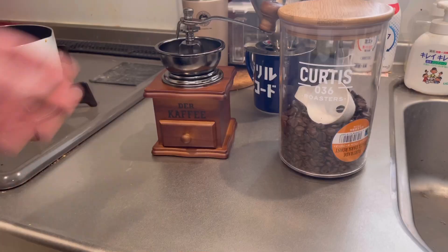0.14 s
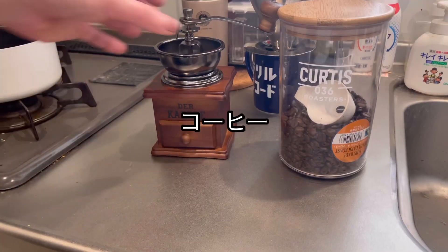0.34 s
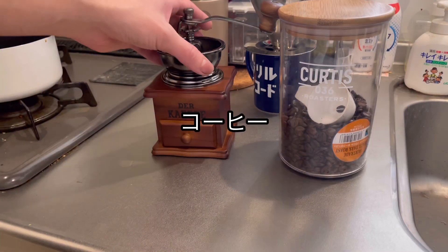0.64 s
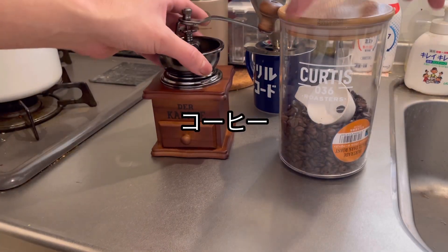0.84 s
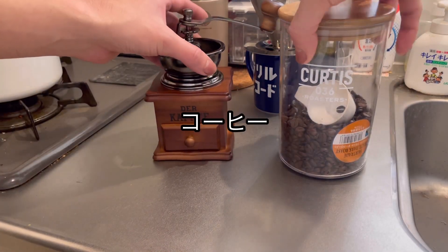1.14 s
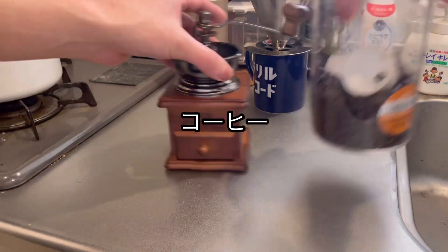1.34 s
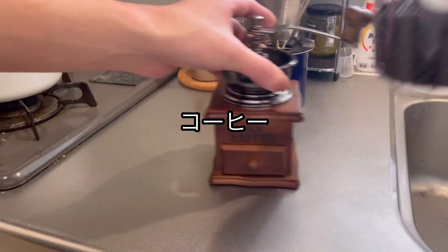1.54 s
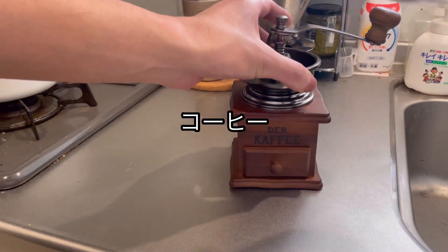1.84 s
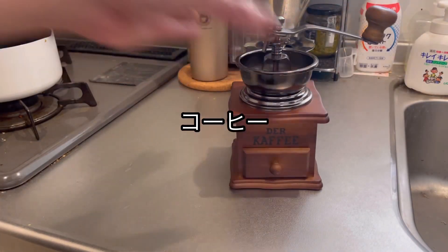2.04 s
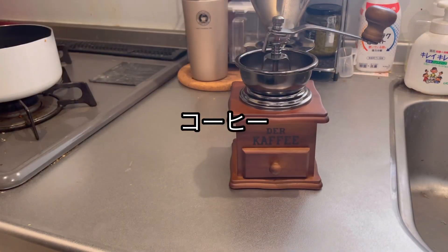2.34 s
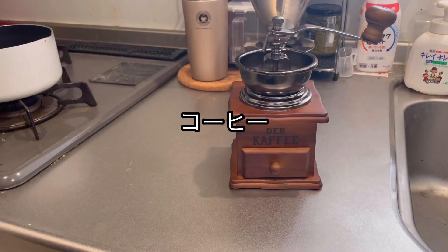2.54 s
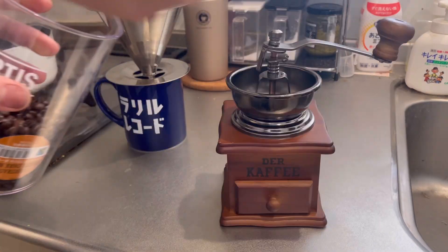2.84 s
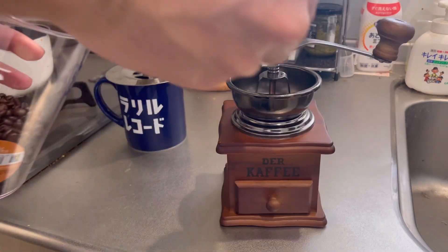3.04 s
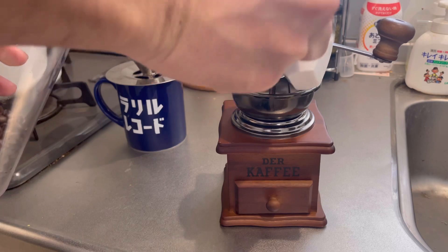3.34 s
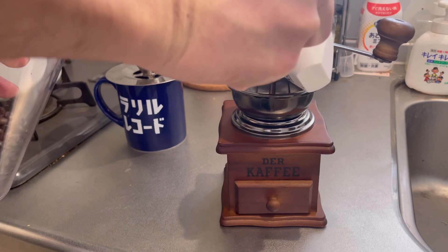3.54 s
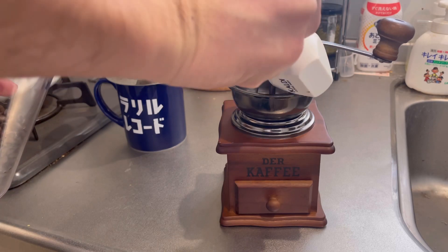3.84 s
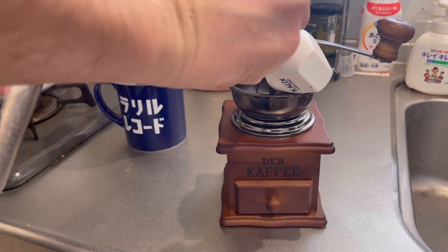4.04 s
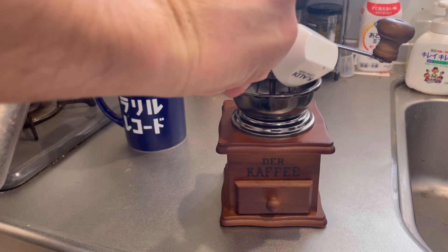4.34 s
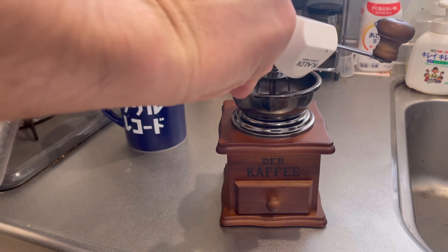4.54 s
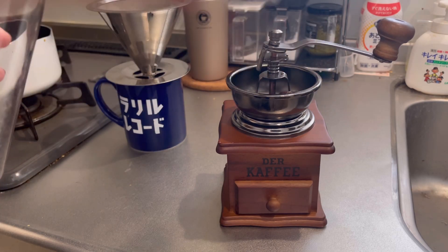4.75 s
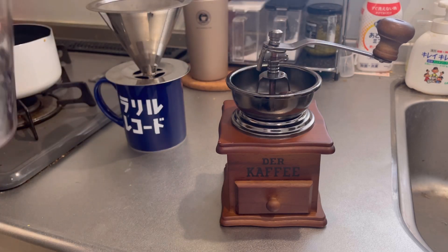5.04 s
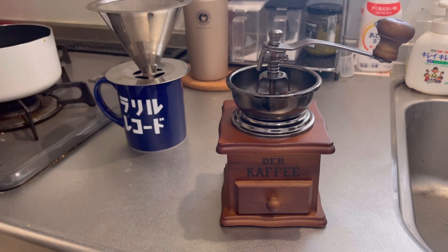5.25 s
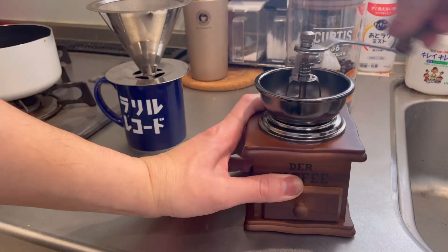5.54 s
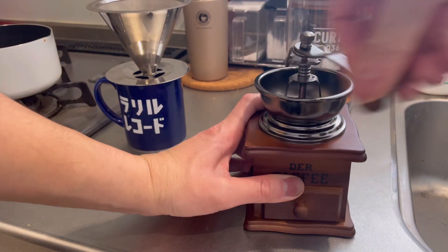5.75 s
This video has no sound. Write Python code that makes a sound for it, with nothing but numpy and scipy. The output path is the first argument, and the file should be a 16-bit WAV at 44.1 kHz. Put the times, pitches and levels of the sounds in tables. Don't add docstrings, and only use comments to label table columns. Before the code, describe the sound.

Soft rustles and counter thuds, a scoop's clink and brief shower of coffee beans in metal, then a sharp clack and harsh crackling grinding.

```python
import sys
import numpy as np
from scipy import signal
from scipy.fft import rfft, irfft, next_fast_len
from scipy.io import wavfile
from scipy.ndimage import uniform_filter1d

SR = 44100
rng = np.random.default_rng(int(sys.argv[2]) if len(sys.argv) > 2 else 0)


def boost_factor(decibels):
    exponent = np.asarray(decibels, float) / 20
    return 10 ** exponent


def inscribe(sig):
    pcm = np.round(np.clip(np.atleast_2d(sig).T, -1, 1) * 32767)
    wavfile.write(sys.argv[1], SR, pcm.astype(np.int16))


N = 259749
T = np.arange(N) / SR


def evened(x):
    return x / np.sqrt(np.mean(x ** 2) + 1e-20)


def drift(samples):
    return evened(uniform_filter1d(uniform_filter1d(rng.standard_normal(N), samples), samples))


def read(points, hz):
    f, value = np.transpose(points)
    return np.interp(np.log(hz + 1), np.log(f + 1), value)


def curves(rows, fade=.01):
    s, *columns = np.transpose(rows)
    gate = np.clip(np.minimum(T - s[0], s[-1] + .01 - T) / fade, 0, 1)
    return gate, *(np.interp(T, s, c) for c in columns)


def colour(x, points):
    gain = np.log(boost_factor(read(points, abs(np.fft.fftfreq(2048, 1 / SR)))))
    taps = np.fft.ifft(np.exp(gain - 1j * signal.hilbert(gain).imag)).real[:1024]
    return signal.oaconvolve(x, taps / np.linalg.norm(taps))[:len(x)]


def resonate(x, hz, width):
    turn = np.exp(2j * np.pi * np.cumsum(hz * np.ones(len(x))) / SR)
    r = np.exp(-np.pi * width / SR)
    return 2 * (turn * signal.lfilter([1 - r], [1, -r], x / turn)).real


def ring(x, hz, t60):
    r = 10 ** (-3 / (t60 * SR))
    w = 2 * np.pi * hz / SR
    return signal.lfilter([0, np.sin(w)], [1, -2 * r * np.cos(w), r * r], x)


def modes(x, table, sign=1):
    return sum(boost_factor(db) * sign ** k * ring(x, hz, t60) for k, (hz, db, t60) in enumerate(table))


def tap(x, hz, t60):
    contact_s = 0.0036
    return ring(ring(x, hz, t60), hz, contact_s) * 2 * (1 - 10 ** (-3 / (contact_s * SR)))


def clicks(times, db):
    x = np.zeros(N)
    np.add.at(x, np.round(np.multiply(times, SR)).astype(int), boost_factor(db))
    return x


def shower(per_s, spread_db):
    size = boost_factor(spread_db * np.minimum(rng.exponential(1, N), 4)) * rng.choice([-1, 1], N)
    return evened(size * (rng.random(N) < per_s / SR))


def splinter(x, t60):
    r = 10 ** (-3 / (t60 * SR))
    return signal.lfilter([1], [1, -r], abs(x)) * rng.standard_normal(N)


def bursts(rows, rise=0.0024):
    out, t, hz = np.zeros(N), np.arange(8192) / SR, np.fft.rfftfreq(8192, 1 / SR)
    for s, db, centre_hz, octaves, t60 in rows:
        band = np.exp(-.5 * (np.log2((hz + 1) / centre_hz) / octaves) ** 2)
        shape = boost_factor(db - 8.5 - 60 * t / t60) * np.minimum(t / rise, 1)
        burst = irfft(rfft(rng.standard_normal(8192)) * band) * shape
        burst *= np.linalg.norm(shape) / np.linalg.norm(burst)
        part = out[round(s * SR):][:8192]
        part += burst[:len(part)]
    return out


def stroke(start, top, end, db, ends_db):
    gate = np.clip(np.minimum(T - start, end - T) / 0.046, 0, 1)
    return gate * boost_factor(db + ends_db * np.interp(T, [start, top, end], [1, 0, 1]) ** 1.09)


# (time [s], crushing effort [dB], box drone [dB], box resonance [Hz])
GRIND = [(5.295, -23.5, -40, 958), (5.34, -31, -42, 792), (5.42, -36, -37, 690), (5.5, -30.5, -48, 779),
         (5.54, -35.5, -23, 883), (5.57, -34.5, -61, 800), (5.64, -35.5, -28, 927),
         (5.7, -35.5, -42.5, 897), (5.74, -33, -34, 960), (5.82, -36.5, -35, 670), (5.86, -40.5, -53, 790),
         (5.89, -32, -35, 876)]
# (time [s], snap [dB], snap colour [Hz], box blow [dB], box pitch [Hz])
CRACKS = [(5.2949, -9.5, 3260, -18.5, 811), (5.3159, -7, 2700, -15.5, 965), (5.3248, -6.5, 2240, -30, 1020),
          (5.3341, -8.5, 3030, -21.5, 796), (5.3494, -14, 3300, -22.5, 830), (5.3644, -17, 2300, -25, 669),
          (5.374, -14, 4250, -36, 695), (5.3821, -12.5, 2790, -28, 700), (5.3926, -10.5, 2790, -22, 690),
          (5.4172, -14, 3560, -45, 760), (5.433, -2, 3500, -13, 1006), (5.4444, -20, 3600, -17, 802),
          (5.454, -7, 2400, -10.5, 709.7), (5.4854, -22, 3900, -18, 768), (5.4929, -20.5, 3430, -42, 830),
          (5.5034, -11.5, 3740, -35, 820), (5.508, -25, 4500, -28, 864), (5.52, -20, 3680, -24.5, 796),
          (5.5572, -33, 3580, -35, 795), (5.5742, -10.5, 3380, -12.5, 710), (5.5812, -12, 3620, -13, 846),
          (5.588, -9, 2190, -21.5, 860), (5.5954, -8.5, 3570, -9.5, 766), (5.628, -14, 3700, -9, 860),
          (5.6357, -9, 3500, -16, 966), (5.642, -17, 3300, -23, 938), (5.6551, -14, 3400, -13.5, 904),
          (5.6649, -11, 3780, -22.5, 897), (5.6745, -8.5, 3700, -25, 853), (5.7049, -18, 4500, -48, 840),
          (5.7242, -18, 3700, -24, 927), (5.735, -16, 3780, -38, 940), (5.7442, -14, 3160, -29, 890),
          (5.757, -20, 2670, -38, 890), (5.7697, -14.5, 3380, -19, 830), (5.7872, -12, 2860, -18, 583),
          (5.8094, -23.5, 2620, -29.5, 692), (5.8515, -23, 3460, -41.5, 704),
          (5.8676, -18, 3230, -21.5, 808), (5.88, -19, 3900, -35, 870)]
# (frequency [Hz], level [dB])
CRUNCH = [(200, -8), (400, 4.5), (1300, 2), (2200, 1), (3000, 1.5), (4500, -9.5), (6500, -9), (8300, -2.5),
          (11000, -22), (14000, -22.5), (16500, -26)]
# (frequency [Hz], width [Hz], level [dB])
BURRS = [(2250, 20, -18), (2860, 90, -10.5), (3700, 205, 9.5), (4500, 89, -27)]
# (time [s], level [dB])
LURCHES = [(5.311, -27.5), (5.328, -42), (5.397, -30), (5.472, -52), (5.538, -38), (5.592, -29),
           (5.625, -27), (5.689, -38), (5.739, -41), (5.793, -32), (5.841, -35)]


def grinder():
    gate, crunch_db, box_db, box_hz = curves(GRIND, 0.00086)
    shake_db = -41 - 12 * np.maximum(T - GRIND[0][0], 0)
    s, snap_db, snap_hz, _, _ = np.transpose(CRACKS)
    tick_db = snap_db - 16.5 - 4.5 * (s - s[0])

    grit = shower(1300, 4)
    clumps = boost_factor(4 * drift(300))
    crumbs = gate * boost_factor(crunch_db) * evened(clumps * splinter(grit, 0.012))
    snaps = bursts([(a, b, c, 1.3, .013) for a, b, c in zip(s, snap_db - 2.5, snap_hz)], 0.00085)
    out = boost_factor(2.5) * colour(crumbs + snaps, CRUNCH)
    out += bursts([(a, d + 9, 12000, .5, .014) for a, d in zip(s, tick_db)], 0.00013)

    drive = .7 * crumbs + snaps
    wander = 1 + .008 * drift(900)
    for k, (hz, width, db) in enumerate(BURRS):
        out += boost_factor(db + 6.0) * (-1) ** k * resonate(drive, hz * wander, width)
    out += gate * boost_factor(box_db) * evened(resonate(resonate(clumps * grit, box_hz, 56), box_hz, 250))

    t = np.arange(1800) / SR
    for at, crack_db, crack_hz, db, hz in CRACKS:
        blow = boost_factor(db + 3.5 - 60 * t / 0.029) * np.sin(2 * np.pi * hz * t) * np.minimum(t / 0.001617, 1)
        blow += 0.34 * boost_factor(db + 1 - 60 * t / 0.012) * np.sin(2 * np.pi * 1.2 * hz * t)
        snap = boost_factor(crack_db - 5 - 60 * t / 0.017) * np.sin(2 * np.pi * crack_hz * t)
        blow += snap * np.minimum(t / 0.00072, 1)
        part = out[round(at * SR):][:1800]
        part += blow[:len(part)]

    lurch = np.convolve(clicks(*np.transpose(LURCHES)), np.hanning(200) / 100)[:N]
    return out, lurch + gate * boost_factor(shake_db - 28) * shower(280, 4.5)


# (frequency [Hz], level [dB], t60 [s])
HOPPER = [(1176, -12, 0.08), (1765, -43.5, .04), (1864, -2.5, 0.083), (1923, -21.5, 0.52),
          (2011, 5.5, 0.014), (2423, -6, 0.011), (2840, -12.5, 0.06), (3430, -4.5, 0.028),
          (3900, -25, 0.24), (3830, -1.5, 0.026), (5020, -8.5, 0.14), (5110, -18, 0.12), (5190, 3.5, 0.027),
          (6060, -1.5, 0.021), (6150, -4.5, 0.0048), (5940, -16.5, 0.041), (7220, -4, 0.13),
          (8100, -7, 0.032), (11300, -11.5, 0.11)]
# (time [s], peak [dB], colour [Hz])
BEANS = [(3.6181, -24.5, 1904), (3.6365, -19, 6060), (3.6469, -24, 1860), (3.6975, -22, 1820),
         (3.7074, -23.5, 5050), (3.7232, -19.5, 3830), (3.7356, -20.5, 1880), (3.7612, -38, 7220),
         (3.7778, -19, 6060), (3.769, -34.5, 1900), (3.789, -30.5, 5110), (3.7984, -14.5, 5080),
         (3.805, -18.5, 6060), (3.8284, -23, 5110), (3.8506, -21, 5000), (3.872, -28.5, 5160),
         (3.8896, -31, 5190), (3.9061, -19.5, 6100), (3.92, -25, 5000), (3.933, -28, 1962),
         (3.9543, -30.5, 5000), (3.9733, -29, 6020), (4.0118, -35, 5110), (4.02, -29, 1866),
         (4.0304, -36, 4900), (4.037, -31, 5870), (4.081, -42, 7100), (4.0981, -23, 5110),
         (4.119, -30, 5340), (4.146, -51, 1900), (4.1546, -33, 5160), (4.1616, -34, 5180),
         (4.1737, -44, 5190), (4.179, -33, 5930), (4.193, -19, 5110), (4.211, -44, 1840),
         (4.2536, -26.5, 2004), (4.2641, -26, 5830), (4.276, -35, 5190), (4.2923, -60, 1950),
         (4.3127, -51, 1956), (4.365, -31, 1950), (4.403, -34, 1910)]
# (frequency [Hz], level [dB])
BEAN_TICK = [(700, -28.5), (1500, -7), (3000, -2.5), (6000, -5), (7300, 6.5), (8000, 4.5), (11500, -6),
             (14000, -9), (16500, -17.5)]
# (time [s], level [dB])
PINGS = [(3.815, -34), (3.828, -27), (3.932, -35.5), (4.123, -39.5), (4.163, -41), (4.174, -40),
         (4.2474, -36), (4.261, -40), (4.276, -39), (4.295, -57), (4.33, -54), (4.3566, -38), (4.384, -44),
         (4.403, -48)]
# (frequency [Hz], level [dB], t60 [s])
SPINDLE = [(3500, -5.5, 0.03), (3830, -2.5, 0.027)]
# (time [s], level [dB], frequency [Hz], t60 [s])
RINGS = [(3.203, -36, 5006, 0.33), (3.203, -48, 1911, 0.33), (3.203, -41, 1976, .12),
         (3.205, -43, 1790, 0.12), (3.203, -35, 2430, 0.09), (3.203, -40, 2680, 0.1),
         (3.203, -54, 7220, 0.12), (1.97, -69, 1911, 0.4), (1.96, -67, 1950, .3), (3.186, -63, 2460, 0.25),
         (3.76, -25, 7220, 0.18), (3.758, -36, 11500, 0.15), (3.723, -29, 3700, 0.036),
         (4.408, -56, 5006, 0.25), (4.408, -60, 7220, 0.13)]


def hopper():
    pour_s, full_s, dry_s = 3.615, 3.757, 4.32
    db = -39.5 - np.where(T < full_s, 125 * (full_s - T), 28 * (T - full_s))
    db = db - 149 * np.maximum(T - dry_s, 0)
    clumps = boost_factor(1.5 * drift(250))
    stream = (T > pour_s) * boost_factor(db - 3.5) * evened(clumps * shower(1100, 3.2))

    s, peak_db, colour_hz = np.transpose(BEANS)
    tick_db = peak_db - 4.5 - 8 * (s - pour_s) - 3 * rng.exponential(1, len(s))
    place = rng.standard_normal((len(s), len(HOPPER)))
    out = boost_factor(2.0) * colour(splinter(0.082 * stream, 0.017), BEAN_TICK)
    out += colour(bursts([(a, b - .5, c, .5, .017) for a, b, c in BEANS]), BEAN_TICK)
    out += bursts([(a, d + 9, 11500, .45, .015) for a, d in zip(s, tick_db)], 0.00034)

    for k, (hz, mode_db, t60) in enumerate(HOPPER):
        favoured_db = 9 * np.exp(-(np.log2(hz / colour_hz) / 0.035) ** 2)
        hits = .11 * stream * rng.standard_normal(N)
        hits += clicks(s, peak_db - 18.0 + 3.1 * place[:, k] + favoured_db)
        damped_t60 = min(t60, hz / 34000, 400 / hz)
        out += boost_factor(mode_db) * tap(hits, hz, damped_t60)
    out = signal.sosfilt(signal.butter(2, 850, "high", fs=SR, output="sos"), out)
    pings = clicks(*np.transpose(PINGS))
    out += sum(boost_factor(db) * tap(pings, hz, t60) for hz, db, t60 in SPINDLE)
    return out + sum(tap(clicks([at], db), hz, t60) for at, db, hz, t60 in RINGS)


# (time [s],
# boom [dB], knock [dB])
THUMPS = [(1.013, -35, -41), (1.213, -48, -48), (1.557, -28.5, -44), (1.609, -41, -55),
          (1.895, -19.5, -29.5), (1.912, -40, -36), (1.943, -25, -36.5), (2.159, -66, -38.5),
          (2.292, -52, -51), (3.202, -34, -38), (3.862, -43.5, -44.5), (5.134, -68.5, -41),
          (5.312, -45, -32.5), (5.599, -40, -40), (5.799, -35, -51.5)]
# (frequency [Hz], level [dB], t60 [s])
BOOM = [(117.3, -3.5, 0.4), (146.04, -2, 0.34), (89, -2.5, 0.11), (209, -13, 0.29)]
# (frequency [Hz], level [dB], t60 [s])
KNOCK = [(313.7, 1.5, 0.025), (413, 2, 0.028), (540, -13.5, 0.078), (765, -2, 0.017)]
# (frequency [Hz], level [dB], t60 [s])
PRESSED = [(72.5, -1.5, 0.27), (100, 8.5, 0.1), (114.5, 8.5, 0.14), (149.2, -3, 0.25), (227.4, -0.5, 0.098),
           (348, -2, 0.071)]
# (frequency [Hz], level [dB], t60 [s])
LINGER = [(118, -38, .75), (146, -35, .7)]


def counter(shake):
    s, boom_db, knock_db = np.transpose(THUMPS)
    push = np.convolve(clicks(s, boom_db + 1), np.hanning(200) / 100)[:N]
    blow = np.convolve(clicks(s, knock_db + 6.0), np.hanning(70) / 35)[:N]
    out = modes(push, BOOM, -1) + modes(blow, KNOCK) + modes(shake, PRESSED, -1)
    still = np.clip((2.165 - T) / 0.022, 0, 1)
    out += still * modes(clicks([1.895], 0), LINGER, -1)

    size = next_fast_len(N + 8192)
    hz = np.fft.rfftfreq(size, 1 / SR)
    lag = 0.2267 * (2 * np.sqrt(hz) - hz / np.sqrt(900))
    no_rumble = hz ** 4 / (hz ** 4 + 55 ** 4)
    return irfft(rfft(out, size) * np.exp(-2j * np.pi * lag) * no_rumble, size)[:N]


# (time [s], peak [dB], centre [Hz], t60 [s])
DULL = [(0.731, -44.5, 1400, 0.025), (.774, -45.5, 744, 0.044), (1.559, -51.5, 1460, 0.097),
        (1.898, -40, 1460, 0.25), (1.929, -40.5, 780, 0.19), (1.945, -37.5, 1780, 0.061),
        (2.297, -49.5, 1190, 0.065)]
# (time [s], peak [dB], centre [Hz], t60 [s])
SHARP = [(1.556, -54, 2500, 0.062), (1.897, -49, 6000, 0.013), (1.909, -50.5, 2790, 0.19),
         (1.925, -54, 5000, 0.034), (1.947, -59.5, 3470, 0.18), (2.161, -18, 5940, 0.0065),
         (2.162, -32.5, 1400, 0.062), (2.22, -37.5, 4000, 0.026), (2.352, -53.5, 3750, 0.094),
         (2.798, -55, 4000, 0.0079), (3.466, -38.5, 5030, 0.028), (3.474, -25.5, 7000, 0.016),
         (3.53, -41, 4000, 0.011), (3.581, -51.5, 3960, 0.024), (3.6, -52, 6000, 0.024),
         (5.136, -18.5, 555, 0.018), (5.136, -22, 6100, 0.019), (5.142, -13.5, 7360, 0.08),
         (5.258, -18.5, 4030, 0.016)]
# (peak [dB], centre [Hz], width [octaves], t60 [s])
SCOOP = [(-13, 2100, 0.49, 0.046), (-34.5, 730, 0.49, 0.24), (-36.5, 2900, 0.23, 0.26),
         (-39, 8100, 0.05, 0.22), (-27.5, 9000, .6, .006)]
# (time [s], peak [dB], centre [Hz], width [octaves], t60 [s])
STRAY_BEAN = (4.608, -47, 3700, .07, .03)


def clacks():
    rows = [(s, db, hz, 0.5, t60) for s, db, hz, t60 in DULL]
    rows += [(s, db, hz, 1.1, t60) for s, db, hz, t60 in SHARP]
    rows += [(3.203, *part) for part in SCOOP] + [STRAY_BEAN]
    return bursts(rows, .0005)


# (centre [Hz], width [octaves], level [dB], t60 [s])
EDGE = [(8300, .1, 0, .005), (15200, .08, -5, .012)]


def edges():
    rows = []
    for s, db in [row[:2] for row in CRACKS + BEANS + SHARP]:
        rows += [(s, db - 18 + part_db, hz, octaves, t60) for hz, octaves, part_db, t60 in EDGE]
    return bursts(rows, .0003)


# (frequency [Hz], level [dB])
CLOTH = [(800, -3.5), (1500, 1.5), (3000, -3), (5000, -5.5), (8000, 1.5), (12000, -0.5), (16000, -5.5)]
# (start [s], strongest [s], end [s], level [dB], resonance [Hz])
SLIDE = [
    (0.846, 0.893, 1.2, -78.5, 3900),
    (1.25, 1.55, 1.76, -77.5, 3750),
]
# (start [s], strongest [s], end [s], level [dB], brightness [dB])
STROKES = [(0.53, 0.707, 0.8, -78, -1), (0.658, 0.7, 0.88, -67, -6.5), (0.825, 0.865, 1.7, -88.5, 3.5),
           (1.085, 1.23, 1.38, -76.5, 0.5), (1.256, 1.403, 1.66, -92, 13.5),
           (1.517, 1.664, 1.737, -77.5, 6), (2.145, 2.214, 2.5, -69, -14), (2.445, 2.68, 2.78, -74.5, 2.5),
           (2.865, 3.2, 3.17, -69, -20.5), (3.455, 3.48, 3.87, -67.5, -10), (4.66, 4.776, 4.95, -71.5, -16),
           (4.994, 5.111, 5, -87, 10.5), (5.112, 5.155, 5.57, -56, -4)]


def rustle():
    fibres = colour(rng.standard_normal(N) + 0.31 * shower(1500, 2.5), CLOTH)
    top = evened(signal.sosfilt(signal.butter(3, 5200, "high", fs=SR, output="sos"), fibres))
    low = evened(signal.sosfilt(signal.butter(5, 6000, "low", fs=SR, output="sos"), fibres))
    out, rub = np.zeros(N), rng.standard_normal(N)
    folds = boost_factor(2.5 * drift(900))
    for *span, db, hz in SLIDE:
        out += stroke(*span, db - 0.5, -5) * evened(resonate(resonate(rub, hz, 440), hz, 650))
    for *span, db, bright_db in STROKES:
        out += stroke(*span, db, -14) * folds * (low + boost_factor(1.66 * bright_db + 3.0) * top)
    return out


# (frequency [Hz], t60 [s])
KITCHEN = [(100, .28), (500, .25), (2000, .21), (6000, .13), (14000, .13)]


def kitchen(x):
    taps = np.zeros((2, SR // 2))
    at = np.arange(90, SR // 2 - 20, 20) + rng.integers(0, 20, (2, (SR // 2 - 91) // 20))
    np.put_along_axis(taps, at, rng.choice([-1., 1.], at.shape), 1)
    hz, t, z = signal.stft(taps, SR, nperseg=256)
    tail = signal.istft(z * boost_factor(-60 * t / read(KITCHEN, hz)[:, None]), SR, nperseg=256)[1]
    return signal.fftconvolve(x[None], tail / np.linalg.norm(tail[0]), axes=1)[:, :N]


# (frequency [Hz], phase [rad])
PORTS = [(4200, .1), (4800, .6), (6200, -.5), (7600, -2.95), (8600, -3.35), (10300, -5.85), (12500, -6.6),
         (13900, -9.15)]
# (frequency [Hz], level [dB])
PORT_DB = [(60, -.5), (200, .5), (380, 4.5), (700, -1), (1300, .5), (2400, 0), (4800, 2), (6500, 0)]


def ports(x):
    size = next_fast_len(N + 4096)
    hz = np.fft.rfftfreq(size, 1 / SR)
    half = boost_factor(read(PORT_DB, hz) / 2) * np.exp(.5j * read(PORTS, hz))
    return irfft(rfft(x, size) * np.array([half, 1 / half]), size)[..., :N]


# (frequency [Hz], density [dB per Hz])
HUM = [(12, -40), (28, -9.5), (59, -0.5), (114, -4.5), (132, -19), (169, -10.5), (221, -11.5), (311, -10.5),
       (361, -15), (508, -17.5), (1690, -37.5), (3790, -51.5), (7000, -52.5), (8300, -58), (9600, -59.5),
       (13000, -60), (14800, -100)]
# (frequency [Hz], coherence [0-1])
HUM_SAME = [(60, 0.93), (180, 0.95), (550, 0.29), (1650, 0.01), (4970, 0.097), (15000, 0.16)]
# (frequency [Hz], level over the hum [dB])
FIRST_ROOM = [(30, -35), (200, 17), (400, 4.5), (1000, 9), (2200, 16), (4000, 11.5), (7000, -25)]
# (frequency [Hz], width [Hz], level [dB])
FRIDGE = (312, 8, -62)


def room_tone():
    frames, hz = N // 256 + 5, np.fft.rfftfreq(1024, 1 / SR)
    same = np.clip(read(HUM_SAME, hz), -1, 1)[:, None]
    out = []
    for extra_db in (0 * hz, read(FIRST_ROOM, hz)):
        a, b, c, d, patches = rng.standard_normal((frames, 513, 5)).T
        patches = evened(uniform_filter1d(uniform_filter1d(patches, 6, 0), 14, 1))
        left = a + 1j * b
        z = np.array([left, same * left + np.sqrt(1 - same ** 2) * (c + 1j * d)])
        z *= boost_factor((read(HUM, hz) + extra_db)[:, None] + 1.0 * patches)
        out.append(signal.istft(z, nperseg=1024, noverlap=768)[1][:, :N])
    first_gain = boost_factor(-902 * np.maximum(T - 0.12, 0))
    hum = (out[0] + first_gain * out[1]) / np.std(out[0])
    hz, width, db = FRIDGE
    note = boost_factor(db) * evened(resonate(resonate(rng.standard_normal(N), hz, width), hz, 30))
    return boost_factor(-53.5) * hum + note * boost_factor([[2.5], [-2.5]])


# (frequency [Hz], level [dB])
APART = [(60, -26), (170, -17), (350, -1), (1400, -8), (3800, -7), (6900, -1), (7600, -27), (8800, -27),
         (9700, 0), (13000, -2), (14200, -22)]


def scene():
    ground, shake = grinder()
    near = ground + counter(shake) + clacks() + hopper() + rustle()
    apart = kitchen(colour(near, APART))
    direct = ports(near + boost_factor(-12) * kitchen(near)[0])
    return direct + boost_factor(-8) * apart + edges() + room_tone()


def roll_off(x):
    return signal.sosfilt(signal.butter(12, 16650, fs=SR, output="sos"), x)


def record(dry):
    limited = signal.oaconvolve(dry, signal.firwin(255, 16350, fs=SR)[None], "same")
    return roll_off(limited)


dry = scene()
out = record(dry)
inscribe(out)
```